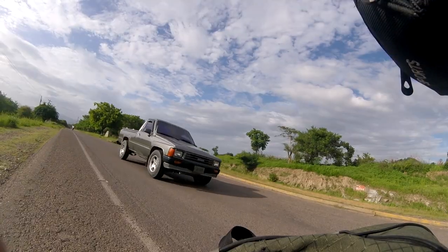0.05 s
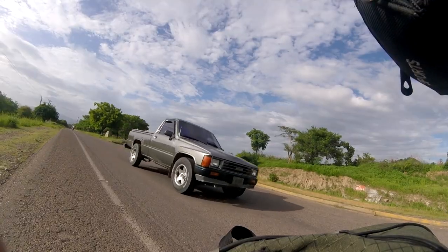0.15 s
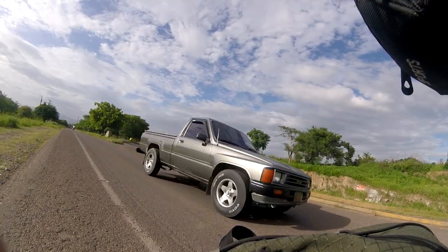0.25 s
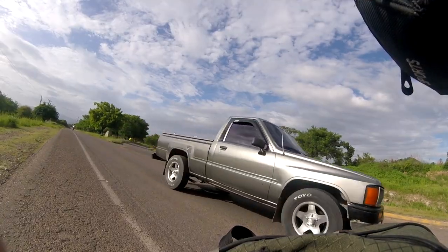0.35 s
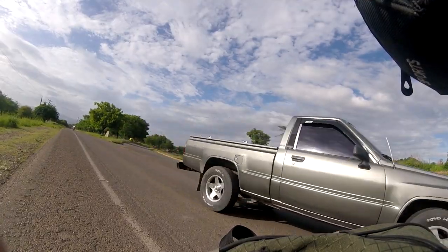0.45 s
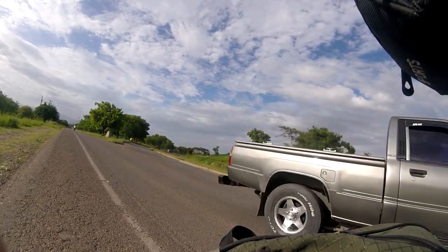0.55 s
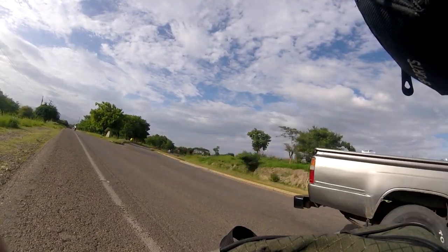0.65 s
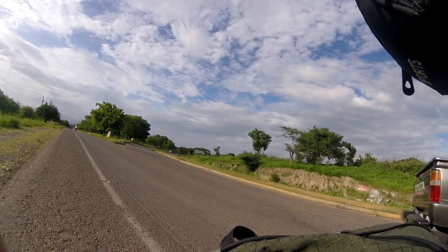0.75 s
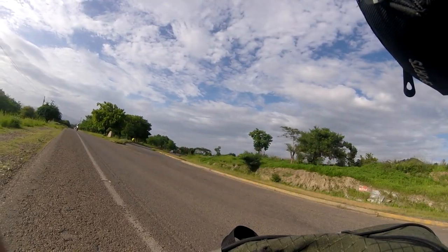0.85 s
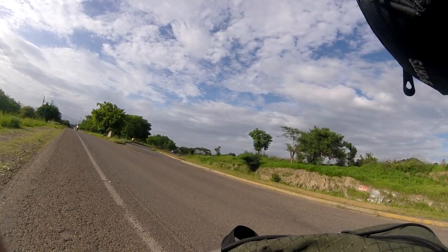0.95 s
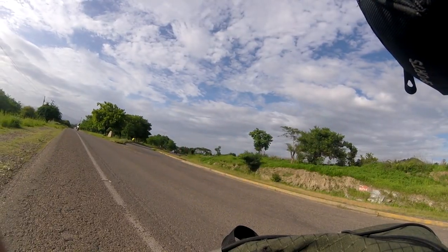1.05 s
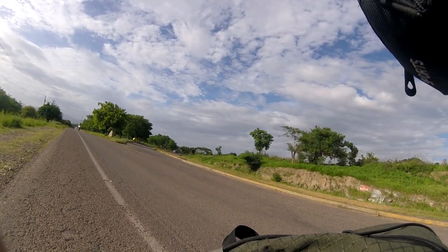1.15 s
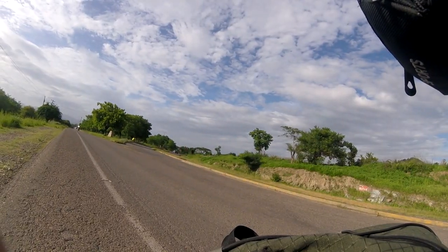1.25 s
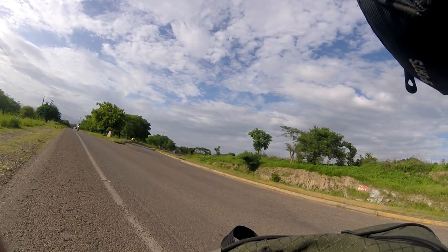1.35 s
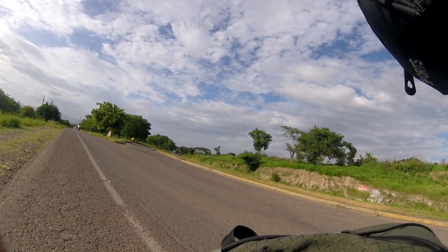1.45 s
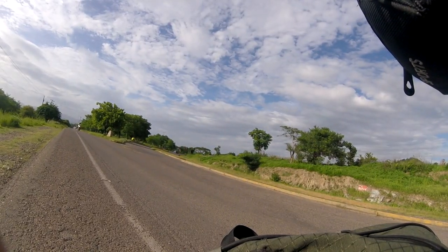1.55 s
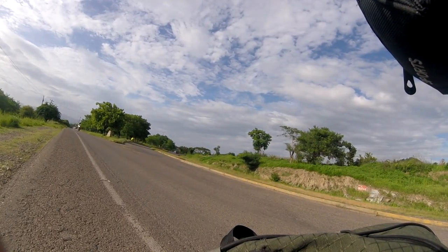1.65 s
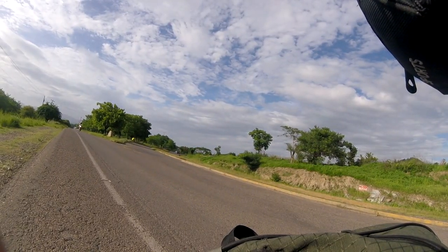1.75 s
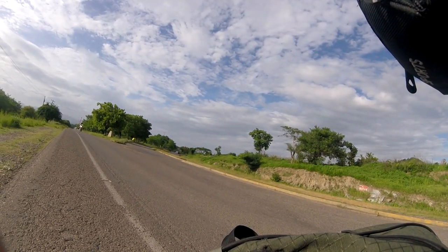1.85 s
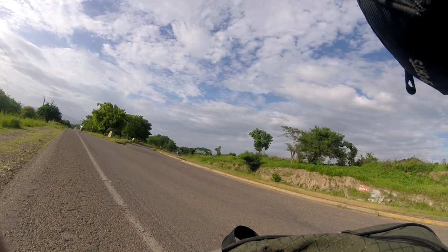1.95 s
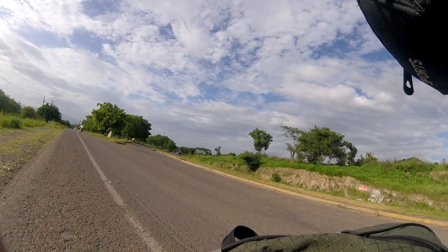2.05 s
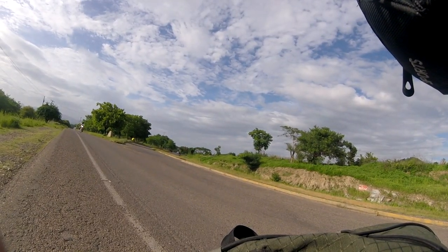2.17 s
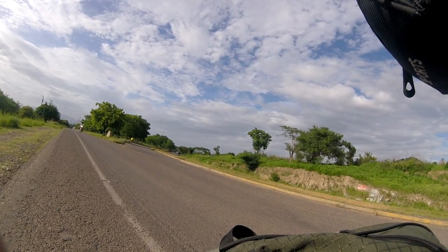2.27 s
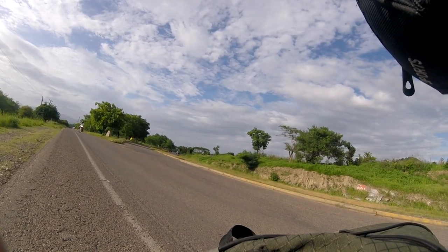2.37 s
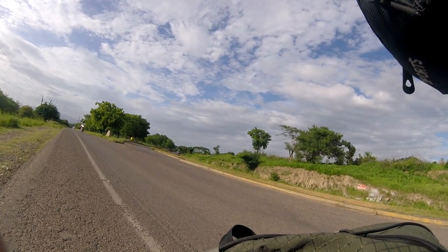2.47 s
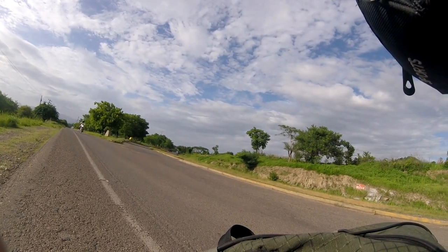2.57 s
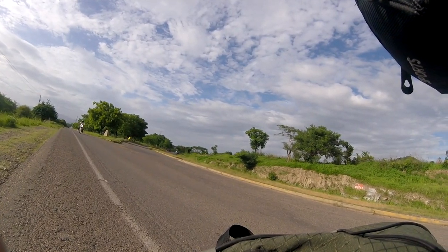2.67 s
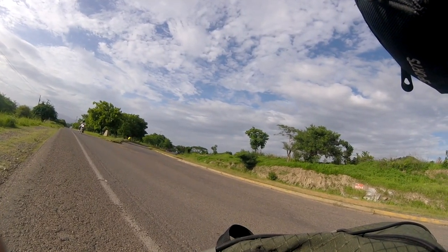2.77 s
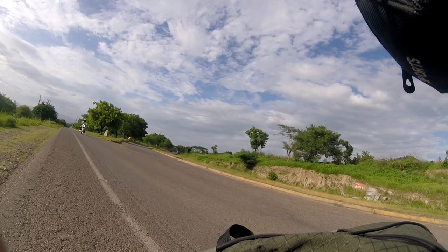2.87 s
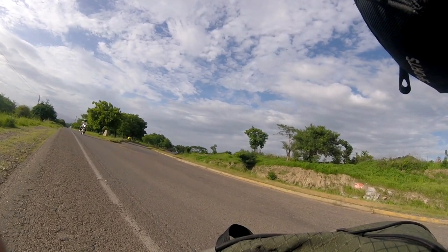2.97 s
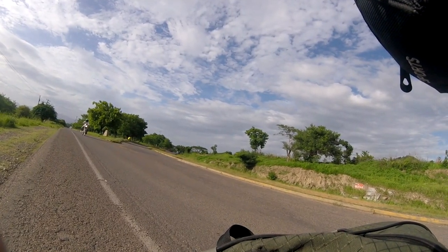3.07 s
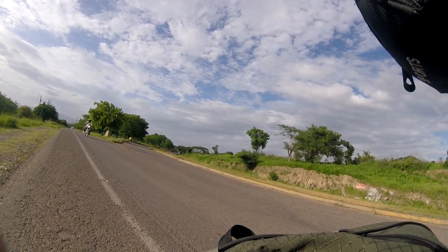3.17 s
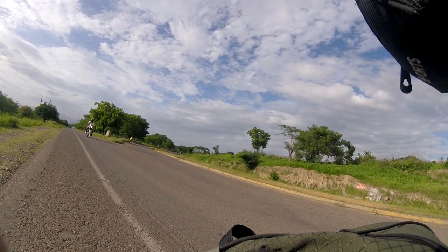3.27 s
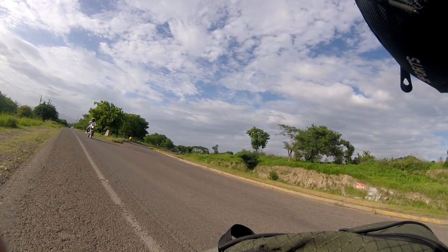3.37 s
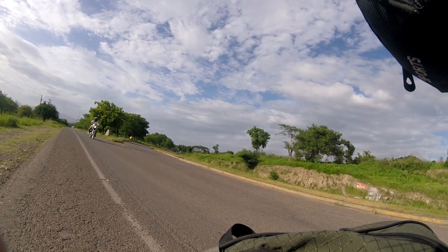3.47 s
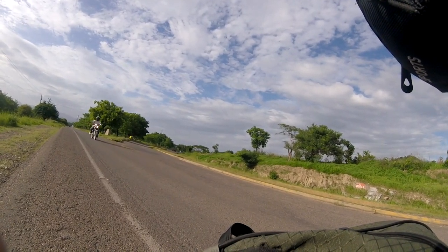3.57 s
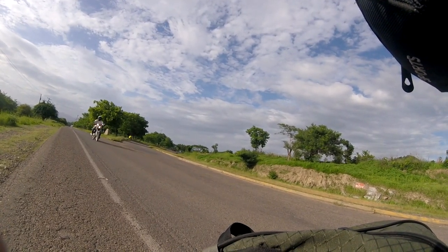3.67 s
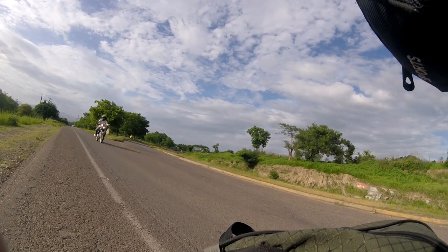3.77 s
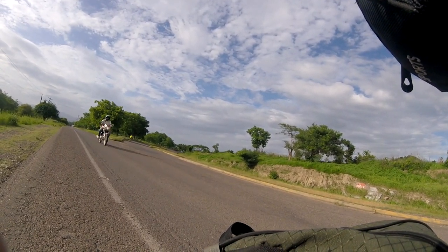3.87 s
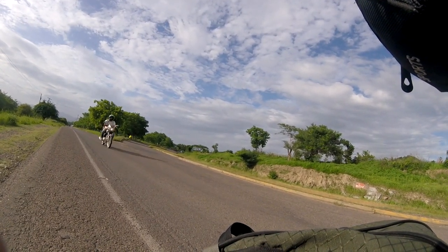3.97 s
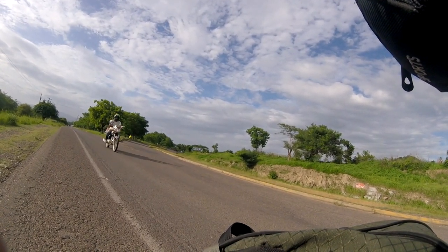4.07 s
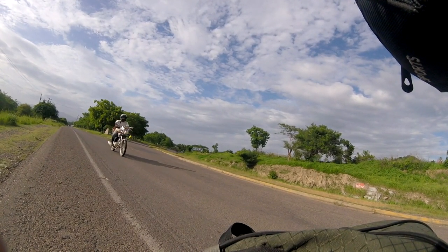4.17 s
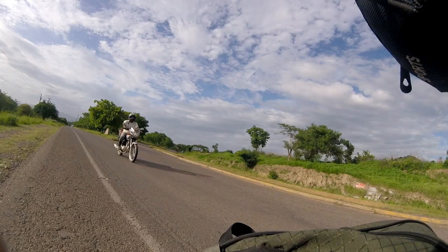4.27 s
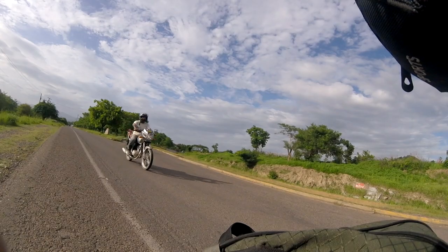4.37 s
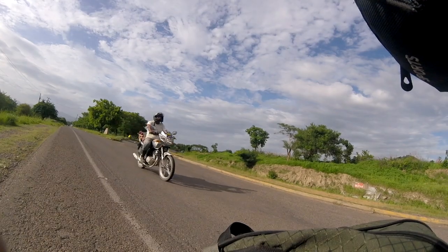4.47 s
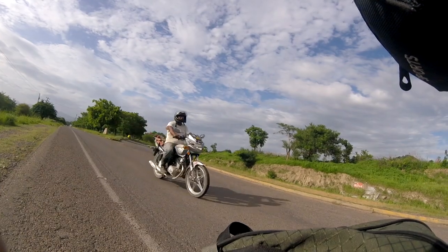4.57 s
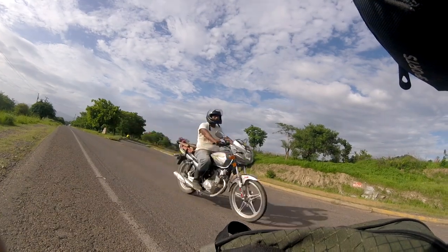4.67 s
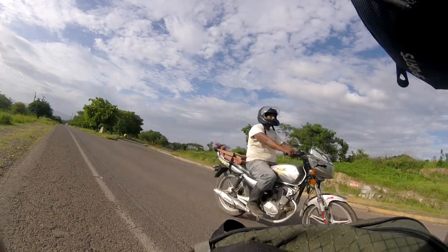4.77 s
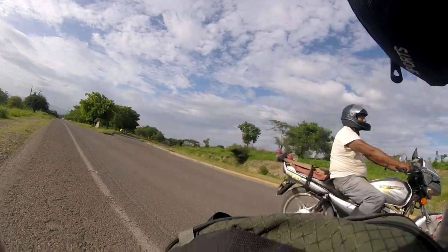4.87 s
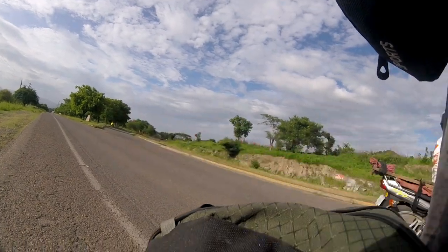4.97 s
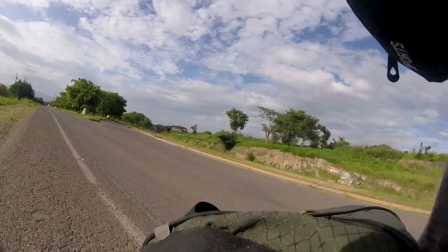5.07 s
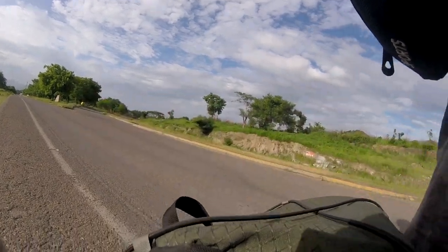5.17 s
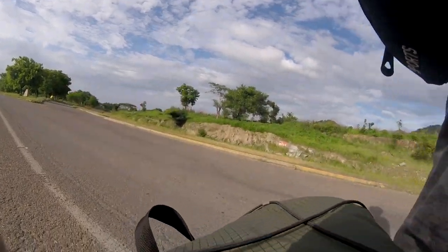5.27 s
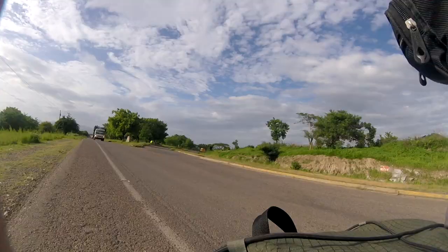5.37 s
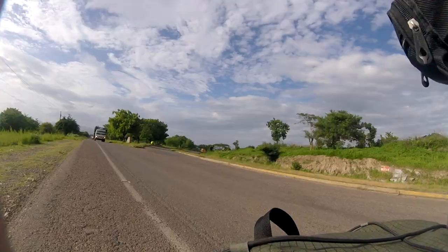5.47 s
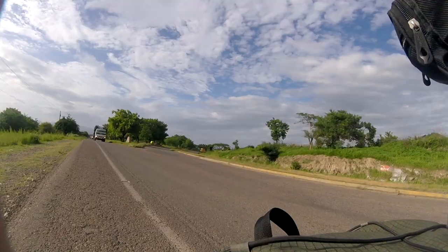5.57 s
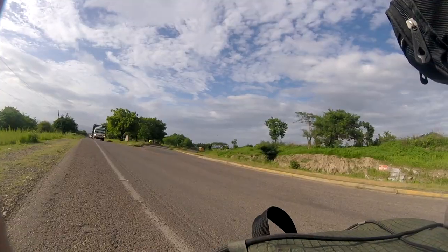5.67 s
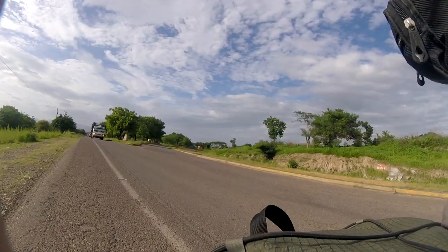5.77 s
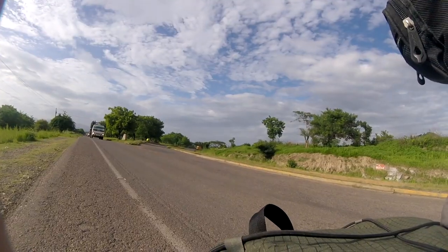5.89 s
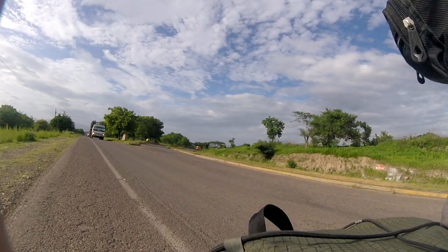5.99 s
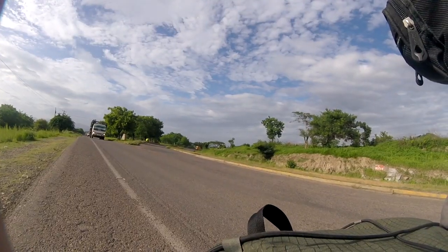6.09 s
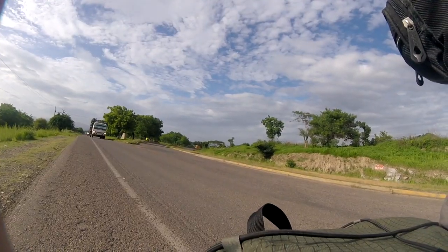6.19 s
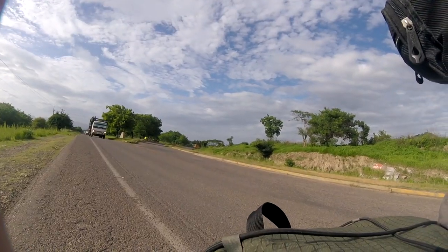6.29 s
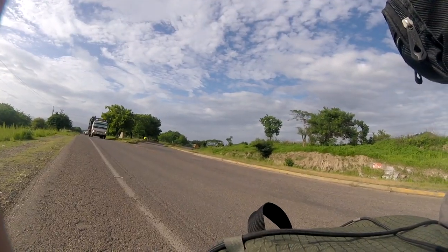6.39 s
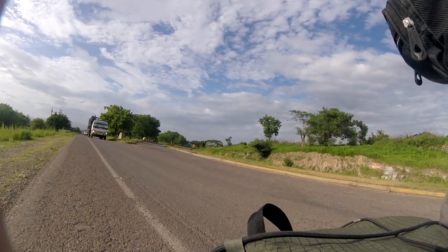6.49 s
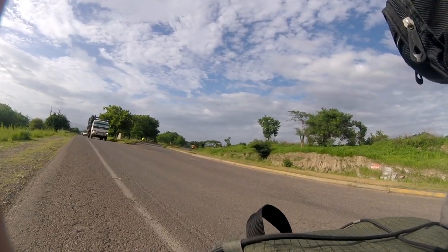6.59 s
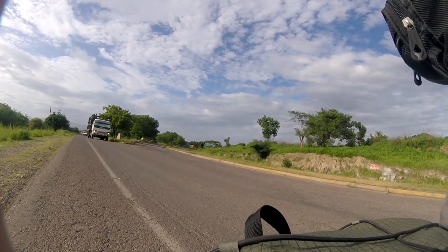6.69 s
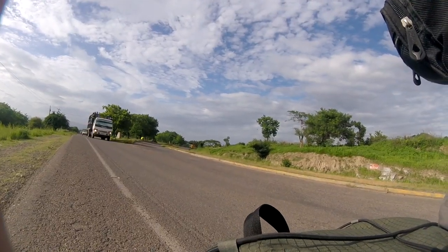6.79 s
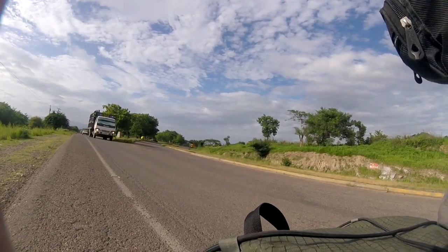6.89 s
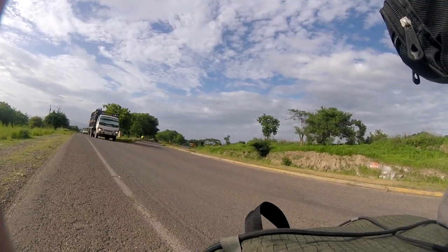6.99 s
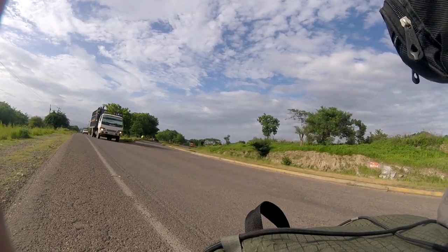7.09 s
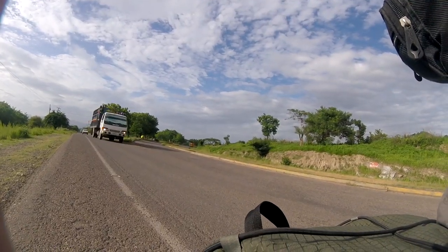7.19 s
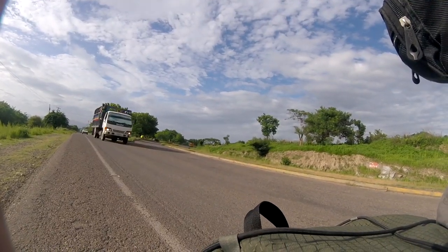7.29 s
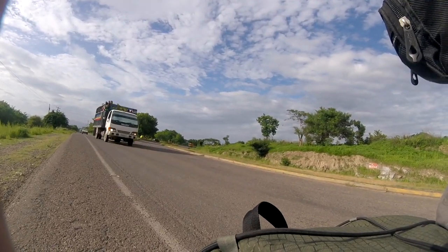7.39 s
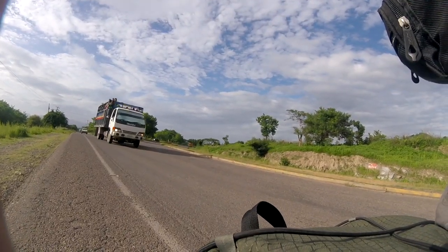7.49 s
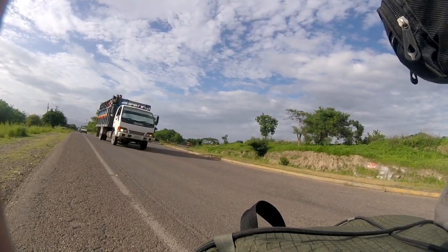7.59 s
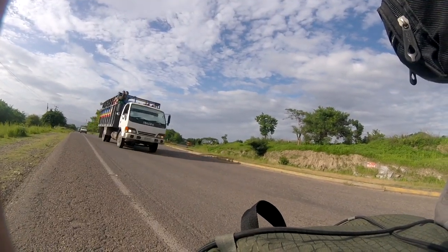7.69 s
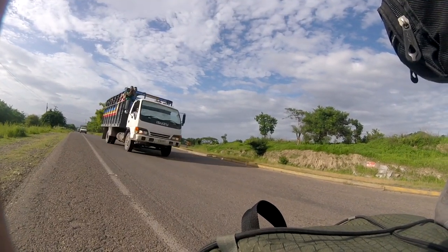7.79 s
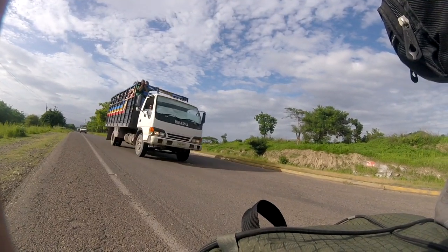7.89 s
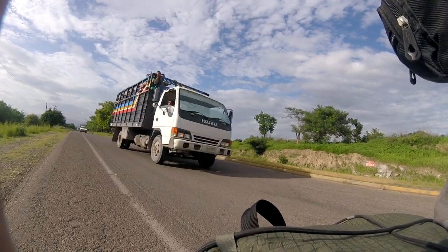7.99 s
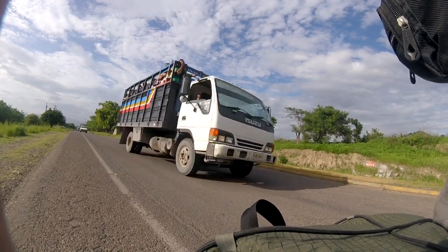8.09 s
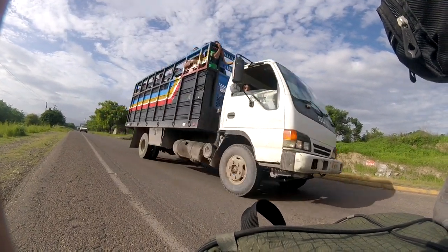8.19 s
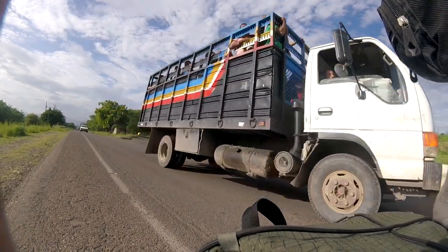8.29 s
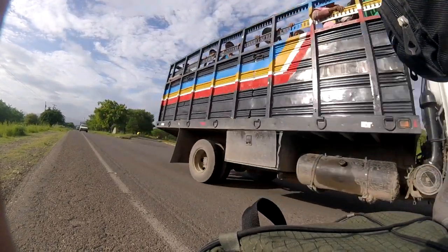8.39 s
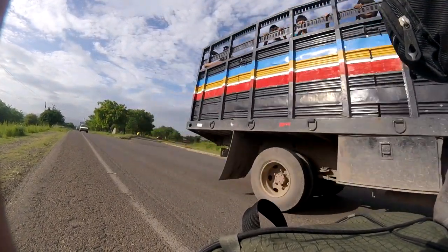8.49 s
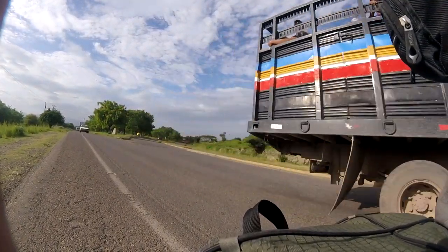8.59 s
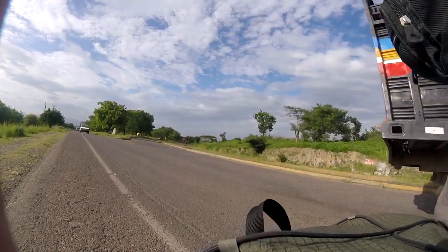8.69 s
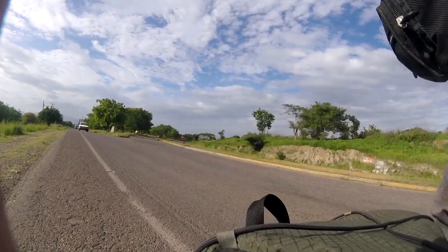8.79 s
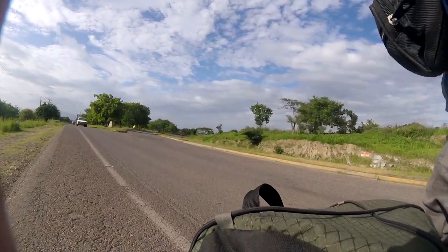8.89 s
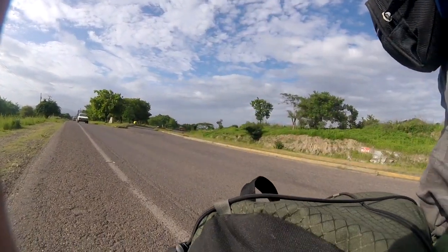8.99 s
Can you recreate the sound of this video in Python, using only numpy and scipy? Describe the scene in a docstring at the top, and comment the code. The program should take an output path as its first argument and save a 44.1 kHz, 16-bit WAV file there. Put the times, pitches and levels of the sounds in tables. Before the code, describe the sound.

Beside an open country road, a microphone on a parked bike hears a pickup whoosh by with roaring tyres, then faint far road wash. A single-cylinder motorcycle builds from a drone to thumping, rattling closeness and passes. Sound drops out briefly; a diesel truck changes gear, swells with growl and knock, and passes loudest. Its wake thumps and crackles on the microphone, with snaps and fabric scrapes.

```python
"""Vehicles pass close to a microphone on a bike parked beside a country road: a pickup with roaring tread,
a thumping single-cylinder motorcycle, then a knocking light diesel truck that changes gear on its way in.
Each part is shaped noise, pulses or tones; it swells with nearness and beams forwards or backwards.
Wakes and gusts buffet the microphone throughout. A short silence parts motorcycle and truck; the wash of
far tyres is heard only before it. Fabric scrapes and bright snaps follow in the truck's wake."""
import sys
import numpy as np
from scipy import signal
from scipy.fft import rfft, irfft
from scipy.io import wavfile
from scipy.ndimage import uniform_filter1d, map_coordinates

SR = 44100
rng = np.random.default_rng(int(sys.argv[2]) if len(sys.argv) > 2 else 0)


def master_out(mix):
    """Clip the mix to full scale and print it as 16-bit PCM to the path in sys.argv[1]."""
    frames = np.transpose(np.atleast_2d(mix))
    ceiling = np.clip(frames, -1, 1)
    pcm = np.round(ceiling * 32767).astype(np.int16)
    wavfile.write(sys.argv[1], SR, pcm)


N = 399088
TIME = np.arange(N) / SR

# Spectra, relative since each sound is brought to rms 1. Each row: frequency in Hz, density in dB per Hz.
# Rolling tyres, the pickup's tread blocks, its engine and fan hiss, and the wash of distant tyres
TYRE_SPECTRUM = [(70, 2), (130, -7.5), (260, 1), (380, -3.5), (650, -3.5), (850, -5.5), (1150, -6.5),
                 (1550, -17.5), (2500, -20), (5000, -61)]
TREAD_SPECTRUM = [(500, -4.5), (800, 5), (1300, 1), (1800, -7.5), (3000, -27)]
PICKUP_HISS_SPECTRUM = [(900, -22.5), (1700, -1), (2800, 3.5), (3700, -2), (4800, -3.5), (6150, -11.5),
                        (6600, -41), (9000, -42), (12000, -30.5), (15000, -43.5)]
FAR_ROAD_SPECTRUM = [(40, 4), (110, 0), (240, 0.5), (400, -6.5), (750, -9.5), (980, -5), (1130, -16),
                     (1900, -17.5), (3500, -30.5), (7000, -38.5), (14000, -55)]
# Wind rumble on the microphone, and the crackle of hard eddies; rows as above: Hz, dB per Hz
RUMBLE_SPECTRUM = [(12, -5), (25, 5.5), (42, 4.5), (70, -5.0), (130, -5.0), (260, -15.0),
                   (600, -41.5), (2000, -64.5)]
CRACKLE_SPECTRUM = [(100, -3), (400, 9.5), (1100, 1), (2500, -7), (5200, -17.5), (6900, -44), (14000, -49)]
# Motorcycle exhaust, intake, rasp, engine clatter, chain with tyre hiss, and the gas that drives the
# silencer's modes; rows as above: Hz, dB per Hz
BIKE_EXHAUST_SPECTRUM = [(35, -3), (71, -18.5), (106, -4.5), (142, 6.5), (190, 0), (260, -8.5), (355, -16),
                         (520, -16), (1100, -70.5)]
BIKE_INTAKE_SPECTRUM = [(130, -22), (225, 2), (400, 1.5), (560, 3.5), (660, -5.5), (900, -5), (1150, -23)]
BIKE_RASP_SPECTRUM = [(500, -3), (750, 1.5), (1000, 1.5), (1270, -1.5), (1430, 0), (1620, -1), (2100, -3.5),
                      (2580, -14), (2900, -27), (3600, -36), (6000, -18.5), (7200, -35)]
BIKE_CLATTER_SPECTRUM = [(1000, -14), (1700, -4), (2500, 1), (2900, -2), (3250, 0), (3800, -3.5),
                         (4500, -2), (5900, -9.5), (6800, -33), (8000, -28), (9200, -42.5), (11000, -30),
                         (13500, -33), (15000, -52)]
BIKE_CHAIN_SPECTRUM = [(2500, -21), (4000, -4), (6000, -2), (6800, -13), (9000, -21), (14000, -37)]
SILENCER_GAS_SPECTRUM = [(1000, 1.5), (2700, 0), (3700, -21)]
# Truck growl, diesel knock and hiss, then bag fabric; rows as above: Hz, dB per Hz
TRUCK_BODY_SPECTRUM = [(60, -1.5), (130, -6), (200, -2.5), (265, 1), (340, 0), (490, 2), (590, 0),
                       (720, -8), (860, -3), (990, -18), (2000, -28)]
TRUCK_KNOCK_SPECTRUM = [(700, -13.5), (990, -14), (1120, -1), (1390, 2.5), (1620, 0.5), (1950, 3),
                        (2150, 6), (2430, -4.5), (2800, -15), (3500, -14.5), (6000, -41)]
TRUCK_HISS_SPECTRUM = [(1800, -6), (2650, 7), (3200, 2), (3900, -1.5), (4950, 0.5), (5600, -4.5),
                       (6200, -6), (6700, -23), (7800, -21.5), (9300, -34), (11000, -26.5), (15000, -37)]
FABRIC_SPECTRUM = [(350, 0.5), (1600, -7), (5600, -20.5), (6900, -46)]

# Modes of the motorcycle's finned engine and of its silencer.
# Each row: frequency in Hz before the pitch bend of passing, width in Hz, relative level in dB.
FIN_MODES = [(2590, 260, -7.5), (3080, 590, 3), (3800, 160, -2.5)]
SILENCER_MODES = [(1230, 240, 2.5), (2570, 150, -2)]
# Truck exhaust. Each entry: relative level in dB of the next multiple of the firing rate, from the first up.
TRUCK_ORDER_LEVELS = [1, -3, -11.5, -16.5, -13.5, -16.5]

# Wakes of the three vehicles. Each row: arrival in seconds, rumble level in dB, decay in seconds.
WAKES = [(.5, -27, 0.62), (4.779, -22.5, 0.22), (8.59, -18.5, 0.43)]
# Single gusts. Each row: centre in seconds, rumble level in dB, half length in seconds.
GUSTS = [(0.601, -26, 0.091), (1.197, -31, 0.071), (1.985, -38, 0.41), (2.616, -35.5, 0.18),
         (5.223, -29, .13), (7.3, -34, 0.24), (8.781, -23.5, 0.015), (8.916, -21, 0.073)]
# Eddies that slap the microphone. Each row: start in seconds, thump frequency in Hz, thump level in dB,
# crackle level in dB, crackle decay in seconds.
SLAPS = [(2.135, 118, -11.5, -43, .004), (8.763, 100, -8, -29, .008), (8.781, 523, -5, -18.5, 0.0065),
         (8.796, 335, -6.5, -18, 0.001), (8.848, 304, -9.5, -16, 0.0061), (8.85, 156, -8.5, -8, 0.00094),
         (8.884, 135, -8, -11.5, 0.0034), (8.894, 250, -19, -14.5, 0.0027), (8.9, 201, -16, -17, 0.005),
         (8.934, 190, -9.5, -36, 0.011), (8.957, 132, -9, -22, .004), (8.993, 130, -14, -24, .003)]
# Brief hollow tones. Each row: centre in seconds, frequency in Hz, peak level in dB, half length in seconds.
HOOTS = [(5.427, 389, -26.5, 0.023), (8.584, 376, -19, 0.065)]
# Sharp clicks in the truck's wake. Each row: centre in seconds, level in dB before filtering,
# half length in seconds, centre frequency in Hz, width in Hz.
CLICKS = [(8.7998, -7, .0004, 1500, 6000), (8.887, -8, .0015, 4850, 700)]
# Bag fabric over the microphone. Each row: centre in seconds, level in dB, half length in seconds.
SCRAPES = [(8.902, -25.5, 0.021), (8.984, -24, 0.019)]
# The silent gap. Each row: time in seconds, gain.
SILENT_GAP = [(5.451, 1), (5.455, 0), (5.598, 0), (5.601, .35), (5.66, 1)]

# A light breeze; a wake builds quickly and dies slowly; gusts crackle with the square of their force
BREEZE_DB, WAKE_ATTACK_S, WIND_CRACKLE_DB = -45.5, 0.072, 11
# The motorcycle passes some 1.6 m off, its revs rising until it is alongside; rates precede the pitch bend
BIKE_FIRING_HZ, BIKE_RISE_HZ_PER_S = 31.3, .85
BIKE_PASS_S, BIKE_REACH_S, BIKE_M_S = 4.95, .17, 9.5
# Its crank-rate drone: level kept while distant, greatest depth of its slow fading, fades per second
DRONE_FAR_DB, DRONE_WAVER_DB, DRONE_WAVER_PER_S = -36, 8, 2.13
# The road mirrors the near engine: lag and strength when closest, and how soon both shrink
MIRROR_LAG_S, MIRROR_SHARE, MIRROR_REACH_S = .00092, .38, .33
# The far truck revs up: start, firing rate there, its rise, top of the gear; louder with the revs
REV_START_S, REV_START_HZ, REV_RISE_HZ_PER_S, REV_TOP_HZ = 2.7, 72.1, 26, 110
REV_TOP_DB, REV_DB_PER_HZ = -34, 0.25
# Its gear change on the way in; firing rates precede the pitch bend
OLD_GEAR_HZ, SHIFT_S, SHIFT_LENGTH_S = 98.74, 6.12, .5
NEW_GEAR_HZ, NEW_GEAR_RISE_HZ_PER_S = 75.12, 2.2
# The truck passes some 2.2 m off
TRUCK_PASS_S, TRUCK_REACH_S, TRUCK_M_S = 8.62, .2, 11
TOP_HZ = 14500  # the treble ends here


def undb(db):
    """Decibels to gain."""
    return 10 ** (np.asarray(db) / 20)


def unit(x):
    """Scale to rms 1."""
    return x / np.sqrt(np.mean(x ** 2))


def noise():
    """White noise."""
    return rng.standard_normal(N)


def tone(cycles):
    """A sine of rms 1 that follows a count of cycles."""
    return np.sqrt(2) * np.sin(2 * np.pi * cycles)


def ramp(start_s, length_s):
    """A smooth step from 0 to 1."""
    return (1 - np.cos(np.pi * np.clip((TIME - start_s) / length_s, 0, 1))) / 2


def swell(s, length_s, power):
    """A hump of height 1 around s; a higher power flattens its top and steepens its sides."""
    return np.exp(-((TIME - s) / length_s) ** power)


def walk(rate):
    """Random levels held 1 / rate s and smoothed twice; spread 1."""
    k = int(SR / rate)
    held = noise()[np.arange(N) // k]
    return unit(uniform_filter1d(uniform_filter1d(held, k), k))


def colour(x, spectrum):
    """Ring x through a causal (minimum-phase) body with the given spectrum; rms 1."""
    size = 2 ** 19
    hz, db = np.transpose(spectrum)
    freq = np.maximum(np.arange(size // 2 + 1) * SR / size, 1)
    gain = undb(np.interp(np.log(freq), np.log(hz), db))
    # folding the cepstrum onto positive time makes the body causal
    cepstrum = irfft(np.log(gain))
    cepstrum[1:size // 2] *= 2
    cepstrum[size // 2 + 1:] = 0
    # outside the listed range the response keeps falling
    skirts = 1 / (1 + 1j * freq / hz[-1]) ** 2 / (1 - .5j * hz[0] / freq) ** 2
    return unit(irfft(rfft(x, size) * np.exp(rfft(cepstrum)) * skirts)[:N])


def resonance(x, hz, width_hz):
    """A single resonance whose centre may move; rms 1."""
    turn = np.exp(2j * np.pi * np.cumsum(hz * np.ones(N)) / SR)
    decay = np.exp(-np.pi * width_hz / SR)
    return unit(np.real(turn * signal.lfilter([1], [1, -decay], x / turn)))


def ringing(x, modes, pitch):
    """Ring x through modes that slide together with the pitch factor; rms 1."""
    return unit(sum(undb(db) * resonance(x, hz * pitch, width) for hz, width, db in modes))


def panels(x, t60_s, share):
    """Sheet metal rings on briefly in many close modes, which streaks the spectrum."""
    age = TIME[TIME < t60_s]
    ring = rng.standard_normal(len(age)) * undb(-60 * age / t60_s)
    return unit(x + share * unit(signal.fftconvolve(x, ring)[:N]))


def strokes(cycles, scatter_db):
    """One pulse each time the cycle count passes a whole number, each of its own strength."""
    return np.diff(np.floor(cycles), prepend=np.floor(cycles[0])) * undb(scatter_db * noise())


def bursts(cycles, decay, scatter_db):
    """Noise that flares at each stroke and decays over the cycle; decay is in cycles."""
    strength = undb(scatter_db * noise())[cycles.astype(int)]
    return unit(noise() * strength * np.exp(-(cycles % 1) / decay))


def rattle(cycles):
    """Small metal impacts whose pattern returns with every whole cycle."""
    size = 2048
    return unit(np.interp(cycles % 1 * size, np.arange(size), rng.standard_normal(size)))


def grains(rate, spread_db):
    """Random tiny impacts, a few much harder than the rest."""
    hit = rng.random(N) < rate / SR
    return unit(hit * np.sign(noise()) * undb(spread_db * np.minimum(rng.exponential(size=N), 4)))


def passing(db, pass_s, reach_s, falloff_db, rear_db):
    """Gain of a source driving by: reach_s is its closest distance from the microphone over its speed,
    falloff_db the loss per tenfold distance, rear_db how much it favours the back over the side."""
    along = (TIME - pass_s) / reach_s
    distance = np.hypot(1, along)
    return undb(db - falloff_db * np.log10(distance) + rear_db * along / distance)


def doppler(pass_s, reach_s, speed_m_s):
    """Pitch factor of a source driving by: higher as it comes, lower as it goes."""
    along = (TIME - pass_s) / reach_s
    return 1 / (1 + speed_m_s / 343 * along / np.hypot(1, along))


def pickup():
    """Tyres and tread roar all round; engine and fan hiss mainly towards the front."""
    tyres = colour(noise() * undb(walk(44.2)), TYRE_SPECTRUM)
    # tread blocks slap the coarse asphalt; the wedge between them beams the roar, which rises as it opens
    tread = colour(grains(2500, spread_db=4), TREAD_SPECTRUM)
    horn = resonance(tread, 850 + 400 * ramp(0.59, 0.21), 600)
    hiss = colour(panels(noise(), t60_s=0.035, share=0.33), PICKUP_HISS_SPECTRUM)
    return (tyres * passing(db=-26.0, pass_s=0.44, reach_s=0.28, falloff_db=28.5, rear_db=1.0)
            + horn * passing(db=-31.5, pass_s=0.61, reach_s=0.22, falloff_db=42.5, rear_db=1)
            + hiss * passing(db=-43, pass_s=0.65, reach_s=0.24, falloff_db=28, rear_db=-14.5))


def far_road():
    """A steady wash of distant tyres."""
    return colour(noise(), FAR_ROAD_SPECTRUM) * undb(-36.5)


def wind():
    """Breeze, gusts and wakes rumble on the microphone; gusts crackle, and single eddies slap it."""
    rumble = colour(noise(), RUMBLE_SPECTRUM)
    wakes = sum(undb(db) * ramp(s - WAKE_ATTACK_S, 2 * WAKE_ATTACK_S)
                * np.exp(-np.maximum(TIME - s, 0) / decay) for s, db, decay in WAKES)
    gusts = sum(undb(db) * swell(s, length, 4) for s, db, length in GUSTS)
    force = np.sqrt(undb(BREEZE_DB) ** 2 + wakes ** 2 + gusts ** 2)
    eddies_db = 1.5 * walk(18)
    sputter_db = 3.5 * walk(500)
    pressure = rumble * force * undb(eddies_db)
    flare = undb(WIND_CRACKLE_DB + sputter_db) * gusts ** 2
    for s, hz, thump_db, crackle_db, length in SLAPS:
        age = np.maximum(TIME - s, 0)
        # one push and one pull, eased in
        push_pull = np.sin(2 * np.pi * hz * age) * np.tanh(8 * age * hz) * np.exp(-(age * hz) ** 4)
        pressure = pressure + undb(thump_db) * push_pull
        flare = flare + (age > 0) * undb(crackle_db) * np.exp(-age / length)
    return pressure + np.std(flare) * colour(flare * noise(), CRACKLE_SPECTRUM)


def road_mirror(x, pass_s):
    """Direct sound plus its road reflection: the notches sweep down on the way in and up on the way out."""
    nearness = 1 / np.hypot(1, (TIME - pass_s) / MIRROR_REACH_S)
    # rough asphalt scatters the treble
    smooth = signal.sosfiltfilt(signal.butter(2, 3000, fs=SR, output="sos"), x)
    mirrored = map_coordinates(smooth, [(TIME - MIRROR_LAG_S * nearness) * SR], mode="mirror")
    share = MIRROR_SHARE * nearness
    return (x + share * mirrored) / np.hypot(1, share)


def motorcycle():
    """One exhaust thump every second crank turn; intake barks, fins ring, chain hisses, gas rasps."""
    pitch = doppler(BIKE_PASS_S, BIKE_REACH_S, BIKE_M_S)
    firing_hz = BIKE_FIRING_HZ + BIKE_RISE_HZ_PER_S * np.minimum(TIME, BIKE_PASS_S)
    cycles = np.cumsum(firing_hz * pitch) / SR
    firings = strokes(cycles, scatter_db=.5)
    exhaust = colour(firings, BIKE_EXHAUST_SPECTRUM)

    # the crank-rate drone carries far and fades slowly in and out on the way in
    fading = np.cos(np.pi * DRONE_WAVER_PER_S * (TIME - 4.25)) ** 2
    fading = fading * ramp(2.0, 0.79) * (1 - ramp(4.4, 0.3))
    near_drone = passing(db=-24, pass_s=5.03, reach_s=0.22, falloff_db=20, rear_db=-3.5)
    carry = np.hypot(undb(DRONE_FAR_DB), near_drone)
    drone = -tone(2 * cycles) * carry * undb(-DRONE_WAVER_DB * fading)

    bark = bursts(cycles, decay=0.99, scatter_db=2.5) + noise() + rattle(cycles) + 1.33 * unit(firings)
    intake = colour(bark, BIKE_INTAKE_SPECTRUM)
    rasp = colour(bursts(2 * cycles, decay=1.0, scatter_db=0) + 0.5 * rattle(cycles), BIKE_RASP_SPECTRUM)
    chain = colour(noise(), BIKE_CHAIN_SPECTRUM)
    # the silencer's cross modes sing, slightly more to the front, and sink as it passes
    gas = colour(bursts(2 * cycles, decay=0.86, scatter_db=0), SILENCER_GAS_SPECTRUM)
    singing = ringing(gas, SILENCER_MODES, pitch)
    impacts = noise() * undb(0.54 * walk(200)) + 0.67 * rattle(cycles) + 0.35 * grains(700, spread_db=7.0)
    clatter = colour(panels(impacts, t60_s=0.026, share=0.19), BIKE_CLATTER_SPECTRUM)
    fins = ringing(clatter, FIN_MODES, pitch)
    # the engine's treble opens as it nears; from behind, the rider and panniers shade it
    dull = signal.sosfiltfilt(signal.butter(4, 3200, fs=SR, output="sos"), clatter)
    openness = passing(db=-3, pass_s=4.95, reach_s=0.052, falloff_db=6.0, rear_db=-6)
    clatter = dull + (clatter - dull) * openness

    engine = (intake * passing(db=-26.5, pass_s=4.98, reach_s=0.21, falloff_db=27.5, rear_db=-8.5)
              + rasp * passing(db=-24.5, pass_s=4.91, reach_s=0.11, falloff_db=22.5, rear_db=-0.5)
              + chain * passing(db=-42, pass_s=4.88, reach_s=0.15, falloff_db=20.5, rear_db=-5.5)
              + clatter * passing(db=-29.5, pass_s=4.956, reach_s=0.25, falloff_db=25.5, rear_db=-11.5))
    near = (road_mirror(engine, BIKE_PASS_S - .07)
            + exhaust * passing(db=-21.5, pass_s=4.94, reach_s=0.13, falloff_db=17.5, rear_db=2.5)
            + fins * passing(db=-34.0, pass_s=4.82, reach_s=0.16, falloff_db=35, rear_db=-8)
            + singing * passing(db=-31.0, pass_s=5.04, reach_s=0.11, falloff_db=29, rear_db=-1.5))
    # it comes out from behind the bend
    bend_db = -14 * (1 - ramp(1.12, 2.66))
    return drone + near * undb(bend_db)


def far_truck():
    """Far off only the truck's firing rate carries, a tone climbing to the top of the gear."""
    hz = np.clip(REV_START_HZ + REV_RISE_HZ_PER_S * (TIME - REV_START_S), REV_START_HZ, REV_TOP_HZ)
    db = REV_TOP_DB + REV_DB_PER_HZ * (hz - REV_TOP_HZ)
    on_throttle = ramp(REV_START_S, 0.33) * (1 - ramp(4.0, 0.44))
    return tone(np.cumsum(hz) / SR) * undb(db) * on_throttle


def hoots():
    """Short hollow tones, plain sines that swell and fade."""
    return sum(undb(db) * swell(s, length, 2) * np.sin(2 * np.pi * hz * TIME) for s, hz, db, length in HOOTS)


def truck():
    """A four-cylinder diesel: firing tones, growl, and knock that rings its covers, over bed and tyres."""
    shifted = ramp(SHIFT_S, SHIFT_LENGTH_S)
    new_gear_hz = NEW_GEAR_HZ + NEW_GEAR_RISE_HZ_PER_S * (TIME - SHIFT_S - SHIFT_LENGTH_S)
    firing_hz = OLD_GEAR_HZ + shifted * (new_gear_hz - OLD_GEAR_HZ)
    heard_hz = firing_hz * doppler(TRUCK_PASS_S, TRUCK_REACH_S, TRUCK_M_S)
    cycles = np.cumsum(heard_hz * (1 + .003 * walk(25))) / SR

    # the exhaust grows once the new gear takes the load
    load = ramp(SHIFT_S + SHIFT_LENGTH_S / 2, 0.14)
    exhaust = 0
    for order, db in enumerate(TRUCK_ORDER_LEVELS, 1):
        order_db = db + 1.04 * walk(5.9) - 3.1 * (1 - load)
        exhaust = exhaust + undb(order_db) * tone(order * cycles + rng.random())

    # the growl repeats with each crank turn and with each full cycle of the four cylinders
    growl = noise() * undb(walk(50)) + .4 * rattle(cycles / 2) + .45 * rattle(cycles / 4)
    body = colour(growl, TRUCK_BODY_SPECTRUM)
    knock = bursts(cycles, decay=8.1, scatter_db=0.17) + 0.28 * rattle(cycles / 4)
    knock = colour(panels(knock, t60_s=0.099, share=0.23), TRUCK_KNOCK_SPECTRUM)
    hiss = bursts(cycles, decay=4.5, scatter_db=0.9) + 0.31 * rattle(cycles / 4)
    hiss = colour(panels(hiss, t60_s=0.008, share=0.34), TRUCK_HISS_SPECTRUM)
    tyres = colour(noise(), TYRE_SPECTRUM)

    # once past, the load bed hides all but the exhaust, and the hiss twice over
    hiding = undb(1.5 - 11.0 * ramp(8.6, 0.29))
    hiss = hiss * hiding
    machine = (body * passing(db=-19.0, pass_s=8.34, reach_s=0.31, falloff_db=30.5, rear_db=-2)
               + knock * passing(db=-24.0, pass_s=8.635, reach_s=0.25, falloff_db=31.0, rear_db=-11.5)
               + hiss * passing(db=-21.5, pass_s=8.477, reach_s=0.21, falloff_db=31.5, rear_db=-5.0)
               + tyres * passing(db=-21.5, pass_s=8.41, reach_s=0.29, falloff_db=28.0, rear_db=6.0))
    exhaust = exhaust * passing(db=-24.5, pass_s=8.17, reach_s=0.45, falloff_db=24.5, rear_db=2.5)
    return exhaust + machine * hiding


def far_motorcycle():
    """Only the motorcycle's crank-rate drone, a steady 69 Hz tone, is left as it rides away."""
    return tone(69 * TIME) * undb(-48.5) * (1 - ramp(6.9, 1))


def clicks():
    """Bright resonant snaps in the truck's wake, perhaps a zip pull flicking against the microphone."""
    snaps = 0
    for s, db, length, hz, width in CLICKS:
        flick = noise() * swell(s, length, 2)
        snaps = snaps + undb(db) * signal.lfilter(*signal.iirpeak(hz, hz / width, fs=SR), flick)
    return signal.sosfilt(signal.butter(2, 5000, fs=SR, output="sos"), snaps)


def scrapes():
    """Fabric threads catch and slip in a dense rasp that starts and stops quickly."""
    contact = sum(undb(db) * swell(s, length, 10) for s, db, length in SCRAPES)
    return colour(grains(2500, spread_db=4.5), FABRIC_SPECTRUM) * contact


def scene():
    """Pickup, motorcycle and distant traffic before the silent gap, truck and fading drone after; wind always."""
    before_gap = TIME < SILENT_GAP[1][0]
    early = pickup() + far_road() + motorcycle() + far_truck()
    late = truck() + far_motorcycle()
    traffic = np.where(before_gap, early, late)
    return (traffic + wind() + hoots() + clicks() + scrapes())[None]


def record(dry):
    """Cut the deepest bass, silence the gap, round the hardest peaks and cut the top."""
    gap_s, gap_gain = np.transpose(SILENT_GAP)
    bass_cut = signal.sosfilt(signal.butter(2, 16, "high", fs=SR, output="sos"), dry)
    gapped = bass_cut * np.interp(TIME, gap_s, gap_gain)
    rounded = gapped / (1 + (gapped / .9) ** 8) ** (1 / 8)
    return signal.sosfilt(signal.ellip(8, .2, 70, TOP_HZ, fs=SR, output="sos"), rounded)


dry = scene()
out = record(dry)
master_out(out)
```